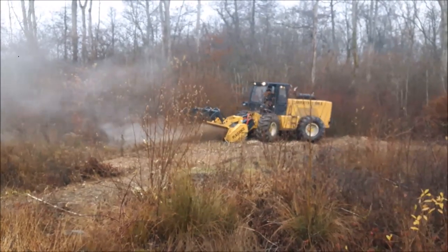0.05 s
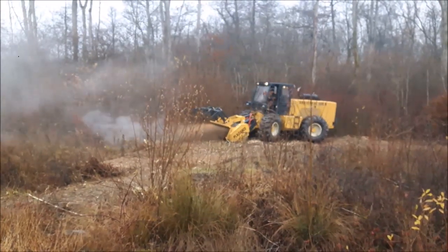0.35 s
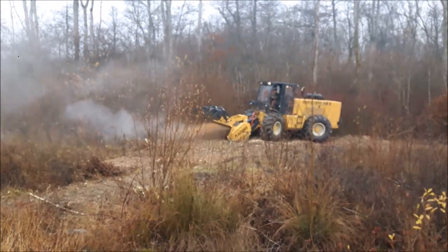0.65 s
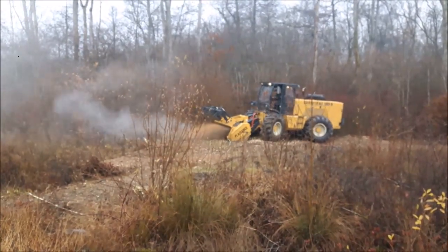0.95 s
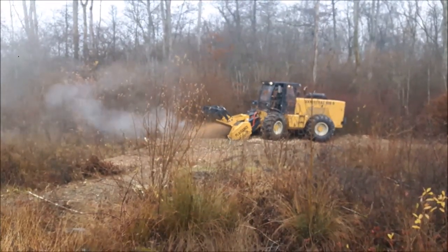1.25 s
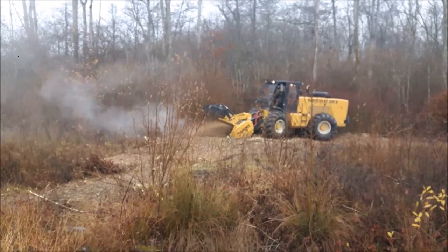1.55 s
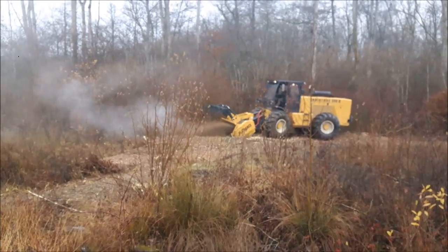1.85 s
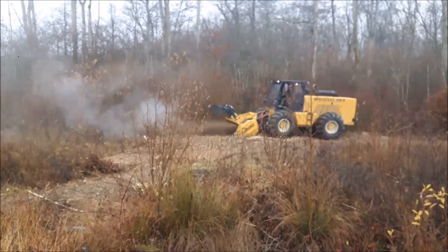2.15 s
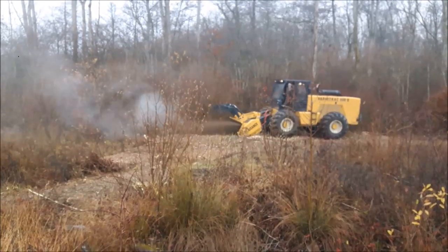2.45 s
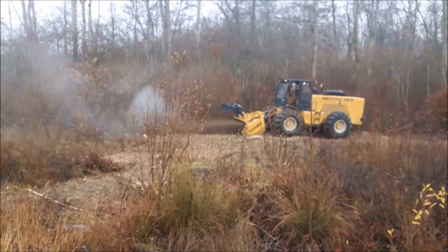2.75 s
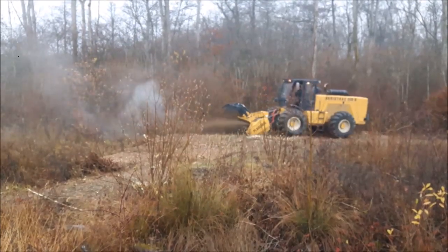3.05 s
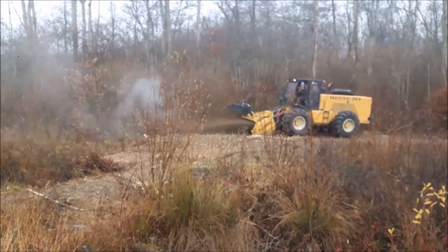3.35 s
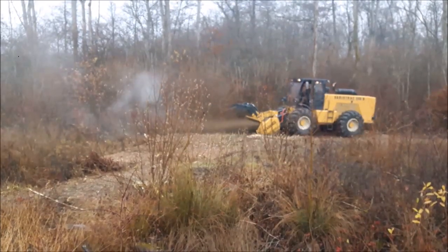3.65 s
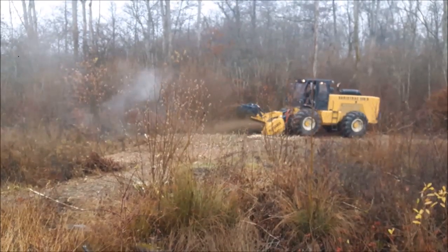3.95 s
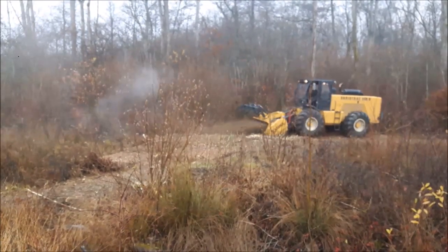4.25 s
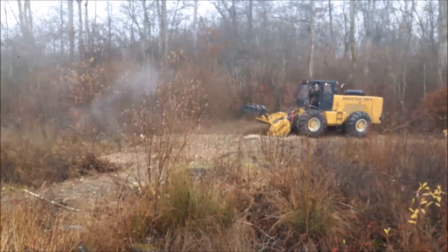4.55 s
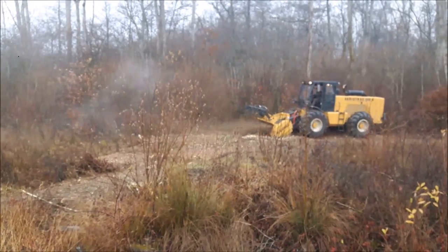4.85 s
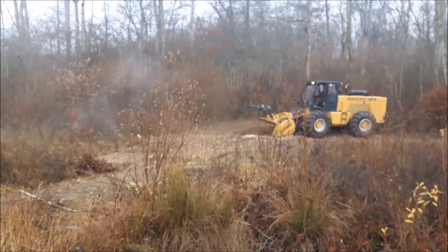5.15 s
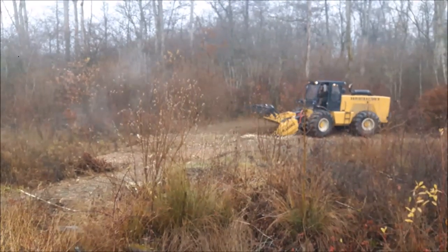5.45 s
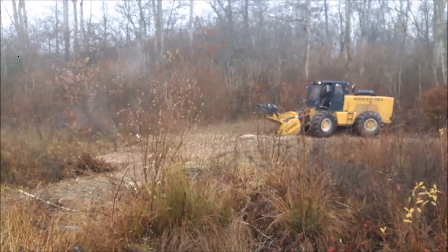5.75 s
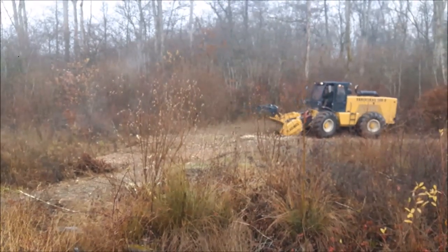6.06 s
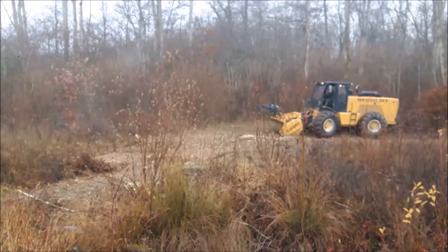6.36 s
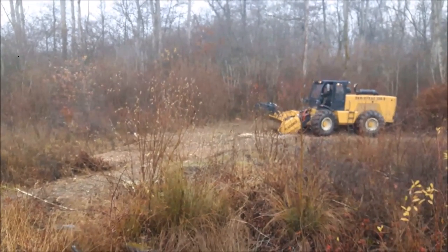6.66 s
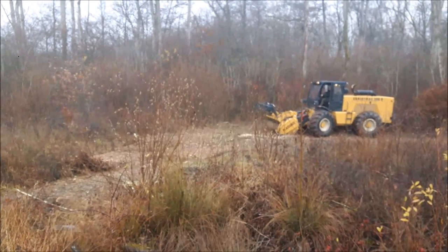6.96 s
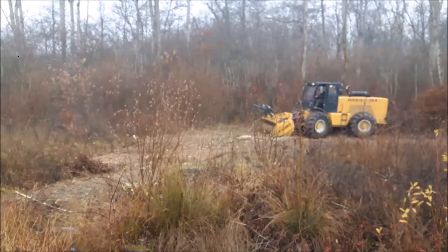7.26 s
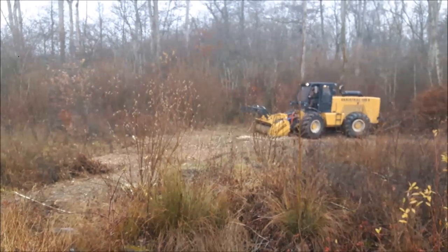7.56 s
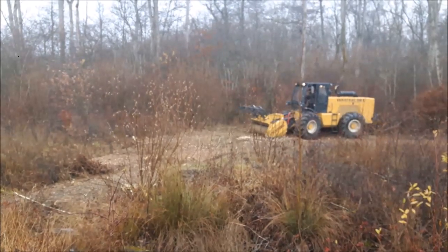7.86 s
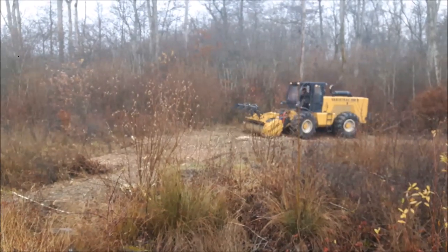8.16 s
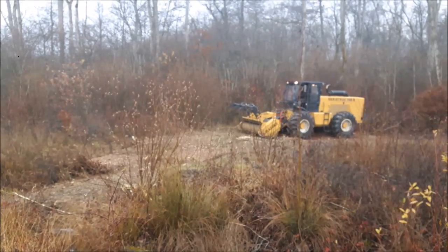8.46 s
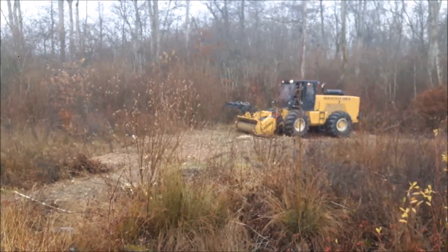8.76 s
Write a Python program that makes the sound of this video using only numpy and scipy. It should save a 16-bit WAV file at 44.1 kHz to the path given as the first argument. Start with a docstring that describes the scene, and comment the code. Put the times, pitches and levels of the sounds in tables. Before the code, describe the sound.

A heavy diesel mulcher sags under a burst of rasping, hissing wood shredding, then climbs back to an even drone. The spinning drum churns and now and then rings as it catches solid wood, while a faint high whistle wavers above. Toward the end the grinding drops away, leaving engine hum, low booming swells and light cracks of sticks. It is heard outdoors from one spot at a moderate distance.

```python
"""A forestry mulcher grinding wood

Some way off, a wheeled mulcher backs across a clearing. Its six-cylinder diesel slows under load in
the first second, recovers, and runs free once the toothed drum lifts, about 6.5 s in. Exhaust pulses
and the churning drum make the drone. The teeth tear wood and ring the steel, the fan roars,
the turbo whistles, and flung chips tick and patter."""
import sys
import numpy as np
from scipy import signal
from scipy.fft import rfft, irfft, next_fast_len
from scipy.io import wavfile
from scipy.ndimage import map_coordinates

SR = 44100
rng = np.random.default_rng(int(sys.argv[2]) if len(sys.argv) > 2 else 0)


def unload_audio(sound):
    """Save the sound as a 16-bit wav file, at the path given as the first command line argument."""
    columns = np.transpose(np.atleast_2d(sound))
    # keep every value between -1 and 1, then stretch to whole-number steps
    steps = np.round(np.clip(columns, -1, 1) * 32767)
    wavfile.write(sys.argv[1], SR, steps.astype(np.int16))


N = 392931
T = np.arange(N) / SR
CYLINDERS, FULL_SPEED_HZ = 6, 110.8  # full speed is counted in firings per second
LIFT_AT_S, LIFT_S = 6.25, 0.52  # when the drum starts to lift out of the wood, and how long it takes


def amp(db):
    """Turns decibels into a gain."""
    return np.exp(np.asarray(db) * (np.log(10) / 20))


def unit(x):
    """Scales a signal to an average (rms) level of 1."""
    return x / np.sqrt(np.mean(x ** 2) + 1e-20)


def curves(rows):
    """Joins a timed table's points into one curve per value column."""
    times, *columns = np.transpose(rows)
    return [np.interp(T, times, column) for column in columns]


def ramp(start_s, length_s):
    """Goes from 0 to 1 and stays there."""
    return np.clip((T - start_s) / length_s, 0, 1)


def swells(rows, rise_s):
    """Adds up the gains of events that rise quickly, then die away."""
    return sum(amp(db) * ramp(start, rise_s) * (1 - ramp(start + rise_s, fade) ** 2) ** 2
               for start, fade, db in rows)


def filtered(x, response):
    """Gives each frequency its own gain, then sets the level to 1."""
    size = next_fast_len(len(x))
    spectrum = rfft(x, size) * response(np.fft.rfftfreq(size, 1 / SR))
    return unit(irfft(spectrum, size)[:len(x)])


def colour(x, spectrum):
    """Shapes a sound's lows and highs to follow a table."""
    hz, db = np.transpose(spectrum)
    return filtered(x, lambda f: amp(np.interp(np.log(f + 1), np.log(hz), db, left=-70, right=-70)))


def ring(x, modes):
    """Makes a sound ring at the listed pitches."""
    return filtered(x, lambda f: sum(amp(db) / (1 + ((f - hz) / (width / 2)) ** 2)
                                     for hz, width, db in modes))


def noise():
    """An even hiss (white noise)."""
    return rng.standard_normal(N)


def wander(rate_hz, step=32):
    """A smooth random wobble, up to about the given rate."""
    knots = T[::step]
    slow = filtered(rng.standard_normal(len(knots)), lambda f: 1 / (1 + (f / step / rate_hz) ** 4))
    return np.interp(T, knots, slow)


def grains(per_s, spread_db):
    """Scattered clicks of random size and sign."""
    at = np.flatnonzero(rng.random(N) < per_s / SR)
    sizes = amp(spread_db * np.minimum(rng.exponential(1, N)[at], 4))
    clicks = np.zeros(N)
    clicks[at] = sizes * rng.choice([-1, 1], N)[at]
    return unit(clicks)


def knocking(firings, share, every, points=400):
    """Noise, a share of which repeats every few firings as the same parts strike again."""
    length = every * points
    pattern = rng.standard_normal(length)
    repeating = np.interp(firings * points, np.arange(length), pattern, period=length)
    return np.sqrt(share) * unit(repeating) + np.sqrt(1 - share) * noise()


# how fast the engine fires: (time [s], firing rate [Hz])
FIRING_RATE = [(0, 101.7), (.22, 101.7), (.55, 86.1), (.82, 75), (1, 73.3), (1.17, 77.7), (1.46, 90.3),
               (1.85, 104), (2.11, 109), (3.28, 109.2), (4.1, 110.5), (5.39, 109.1), (6.1, 111.1),
               (6.8, 111.7), (7.35, 109.2), (8.91, 109.5)]
# how hard the exhaust beats: (time [s], level [dB])
EXHAUST_LEVEL = [(0, -16.5), (.5, -20), (1, -22), (1.8, -17.5), (2.15, -19.8), (3.25, -20.5), (4.1, -23.5),
                 (5.35, -23), (6.9, -27), (8.3, -23), (8.91, -23.5)]


def engine_effort():
    """Firing rate and exhaust level: the engine slows under load, then recovers."""
    firing_hz, = curves(FIRING_RATE)
    exhaust_db, = curves(EXHAUST_LEVEL)
    return firing_hz, exhaust_db


# higher tones in each exhaust pulse: (multiple of the firing rate [x], level [dB])
EXHAUST_OVERTONES = [(2, -3), (3, -5.5), (4, -17)]
# hum of uneven cylinders and driven shafts: (multiple of the engine cycle rate [x], level [dB])
SHAFT_TONES = [(2, -60), (3, -47), (4, -62), (9, -33), (10, -32), (13, -44), (14, -29), (15.36, -32.5),
               (18, -33), (20, -37)]


def diesel(firings, firing_hz, exhaust_db, full_sag_hz=21):
    """Exhaust pulses drone over humming shafts, and sharpen as the slowing engine gets more fuel."""
    strain = np.clip((FULL_SPEED_HZ - firing_hz) / full_sag_hz, 0, 1)
    tone = -np.cos(2 * np.pi * firings) * amp(-0.32 * wander(16))
    edge = -sum(amp(db) * np.cos(2 * np.pi * k * firings) for k, db in EXHAUST_OVERTONES)
    edge_gain = amp(-7 + 6.5 * strain + wander(9))
    pulses = amp(exhaust_db) * (tone + edge_gain * edge)
    cycles = firings / CYLINDERS  # each cylinder fires once per cycle
    shafts = sum(amp(db + 2.5 * wander(1.84)) * np.cos(2 * np.pi * k * cycles + .5 * wander(3.6))
                 for k, db in SHAFT_TONES)
    shaft_gain = amp(-2 - 4 * strain + 0.88 * (exhaust_db - exhaust_db.mean()))
    return np.sqrt(2) * (pulses + shaft_gain * shafts)


# roar of the fan and valves: (frequency [Hz], level [dB])
FAN_SPECTRUM = [(300, -18), (440, -4), (540, -9.5), (640, 2.5), (900, 2), (1060, -1), (1300, -1.5),
                (1450, -3.5), (1680, -17), (2000, -5.5), (2600, -18.5), (3450, -20), (3850, -27.5),
                (6000, -34.5), (15700, -79)]
# low rush of the fan blades: (pitch [Hz], width [Hz], level [dB])
BLADE_RUSH = [(521, 203, 0)]


def fan_and_valves(firings, speed):
    """The cooling fan roars and the valves clatter, both quieter when the engine slows."""
    roar_gain = amp(-28.5 - 1.5 * ramp(LIFT_AT_S, LIFT_S)) * speed ** 0.4
    roar = colour(knocking(firings, share=0.12, every=CYLINDERS), FAN_SPECTRUM)
    rush_gain = amp(-38) * speed ** 5
    return roar_gain * roar + rush_gain * ring(noise(), BLADE_RUSH)


# whines of the gears and oil pumps: (multiple of the engine cycle rate [x], level [dB])
PUMP_WHINES = [(40, -49), (54, -50), (62.25, -47), (70.5, -46), (78, -52), (112, -56)]


def pumps(firings, flutter_db=3.5):
    """Gears and pumps driven by the engine give wavering whines, louder once the drum lifts."""
    cycles = firings / CYLINDERS
    whines = sum(amp(db + flutter_db * wander(5.8)) * np.sin(2 * np.pi * k * cycles + .15 * wander(8.6))
                 for k, db in PUMP_WHINES)
    return np.sqrt(2) * amp(-4 + 3 * ramp(LIFT_AT_S, LIFT_S)) * whines


# boom of the drum's housing: (frequency [Hz], level [dB])
BOOM_SPECTRUM = [(110, -52), (145, -26), (165, 9), (190, 6.5), (215, 2.5), (250, -31.5), (330, -43)]
# moments when the boom swells: (start [s], fade [s], level [dB])
BOOM_SWELLS = [(.18, 0.34, -22), (3.15, 0.96, -25), (6.05, .3, -28), (6.95, 0.54, -27), (7.85, 0.43, -20),
               (8.25, 1.6, -22.5)]
# rumble of tumbling mulch: (frequency [Hz], level [dB])
CHURN_SPECTRUM = [(20, -38), (42, -32), (55, -13.5), (90, -8.5), (135, -10), (200, -4.5), (270, -1),
                  (350, -3), (400, -6.5), (460, -11.5), (530, -30), (800, -81)]


def drum(speed, exhaust_db):
    """The spinning drum booms in its housing and tumbles the mulch, harder as the engine pulls."""
    surges = amp(-1.5) * swells(BOOM_SWELLS, rise_s=0.088)
    boom_gain = np.hypot(amp(-28) * speed ** 4, surges)
    calm = ramp(start_s=5.56, length_s=0.52)  # the drum leaves the deep mulch
    churn_gain = amp(-24 + 0.44 * (exhaust_db - exhaust_db.mean()) - 2.5 * calm) * speed ** 0.2
    return boom_gain * colour(noise(), BOOM_SPECTRUM) + churn_gain * colour(noise(), CHURN_SPECTRUM)


# how much wood the teeth take, compared with steady cutting: (time [s], level [dB])
WOOD_FEED = [(0, 2.5), (.15, 12.5), (.68, 11), (1.1, 5.5), (2.1, -2), (2.6, -2.5), (3.3, 1), (5.3, 1.5),
             (5.9, -3.5), (8.91, -6)]


def in_wood(level_db, follow, lifted_db, linger_s=0):
    """Gain of a cutting noise: it grows with more wood and drops when the drum lifts."""
    feed_db, = curves(WOOD_FEED)
    return amp(level_db + follow * feed_db + lifted_db * ramp(LIFT_AT_S + linger_s, LIFT_S))


# wood tearing: (frequency [Hz], level [dB])
TEAR_SPECTRUM = [(1500, -41), (2180, -14), (2420, 6.5), (2950, 1), (3350, -1), (3800, -10.5), (4250, -16),
                 (4600, -23), (5000, -6), (5900, -50), (6700, -23.5), (9000, -53)]
# hiss of flying fibres: (frequency [Hz], level [dB])
SPRAY_SPECTRUM = [(3000, -29), (4600, -7.5), (6100, -0.5), (6700, -31), (7200, -6.5), (7600, -8.5),
                  (8000, 1), (8700, 0.5), (9600, 2.5), (10800, -2.5), (12000, -11.5), (13000, -12),
                  (14200, -7), (15700, -5)]


def cutting():
    """Teeth tear the wood unevenly and throw a hissing spray of fibres, which hangs on briefly."""
    fibres = noise() + 0.58 * grains(per_s=1500, spread_db=4.5)
    fibres *= amp(1.1 * wander(24))
    tear_gain = in_wood(level_db=-42, follow=1.1, lifted_db=-12)
    spray_gain = in_wood(level_db=-50.5, follow=0.56, lifted_db=-14, linger_s=0.16)
    return tear_gain * colour(fibres, TEAR_SPECTRUM) + spray_gain * colour(fibres, SPRAY_SPECTRUM)


# the teeth catch solid wood: (start [s], fade [s], low ring [dB], high ring [dB], rasp [dB])
SOLID_BITES = [(.39, 0.16, -24, -27, -41), (.62, 0.17, -34, -29, -35), (.78, 0.3, -24, -29, -48),
               (1.284, 0.35, -23, -43, -48), (4.828, 0.23, -19, -31, -41), (5.24, .2, -26, -42, -49),
               (5.51, 0.18, -27, -26, -32), (5.572, .24, -20.5, -34, -51), (6.25, 0.44, -27.5, -37, -55),
               (8.17, .3, -34, -39, -53), (8.5, 0.38, -34, -52, -65)]


def bites():
    """Each bite swells three gains: the steel's low ring, its high ring and the wood's rasp."""
    starts, fades, *levels = np.transpose(SOLID_BITES)
    return [swells(zip(starts, fades, db), rise_s=0.038) for db in levels]


# the steel drum's low ring: (pitch [Hz], width [Hz], level [dB])
LOW_RING = [(1142, 240, -4), (1223, 94, -4), (1276, 76, 5)]
# its high ring: (pitch [Hz], width [Hz], level [dB])
HIGH_RING = [(1798, 294, -2), (1870, 110, 0), (1918, 60, -3.5)]


def steel(firings, low_bites, high_bites, bite_db=-4.5, growth_db_per_s=0.52):
    """Tooth after tooth hits wood and rings the engine-driven drum; solid bites ring it harder."""
    blows = knocking(firings, share=0.21, every=3) + 0.71 * grains(per_s=400, spread_db=3.5)
    blows *= amp(wander(21))
    low_cutting = in_wood(level_db=-33, follow=0.55, lifted_db=-13) * amp(growth_db_per_s * T)
    high_cutting = in_wood(level_db=-34, follow=0.66, lifted_db=-20)
    low_gain = np.hypot(low_cutting, amp(bite_db) * low_bites)
    high_gain = np.hypot(high_cutting, amp(bite_db) * high_bites)
    return low_gain * ring(blows, LOW_RING) + high_gain * ring(blows, HIGH_RING)


# the ring of wood as it is torn: (pitch [Hz], width [Hz], level [dB])
WOOD_RING = [(2760, 720, 11), (3020, 300, -20)]


def wood_rasp(rasp_bites):
    """Solid wood gives a short rasp each time the drum bites into it."""
    scrape = noise() + 0.73 * grains(per_s=750, spread_db=-3)
    return amp(-1) * rasp_bites * ring(scrape, WOOD_RING)


# the turbo's whistle, sinking as its air pressure falls: (time [s], pitch [Hz], level [dB])
TURBO_WHISTLE = [(1.2, 9860, -68), (1.95, 10270, -53), (2.3, 10100, -70), (3.1, 10020, -68),
                 (3.65, 9950, -53), (4.1, 9600, -54), (4.45, 9470, -54), (5, 9420, -62), (5.65, 9680, -59),
                 (5.9, 9500, -61), (6.5, 8680, -53), (6.68, 8450, -63), (6.85, 8220, -50), (7.1, 7970, -53),
                 (7.35, 7870, -61), (7.8, 7990, -55), (8.2, 7990, -59), (8.65, 8180, -61)]


def turbo(jitter=0.00146, flutter_db=4, breath_ratio=1.7, breath_width_hz=440):
    """Spinning blades whistle thinly; a breathy hiss joins in once the load comes off."""
    hz, db = curves(TURBO_WHISTLE)
    phase = 2 * np.pi * np.cumsum(hz * (1 + jitter * wander(106))) / SR
    whistle = np.sqrt(2) * np.sin(phase) * amp(db - 4 + flutter_db * wander(21))
    # two low rumbles are shifted up to make a band of hiss above the whistle
    rumble_a, rumble_b = (ring(noise(), [(0, breath_width_hz, 0)]) for _ in range(2))
    breath = rumble_a * np.cos(breath_ratio * phase) + rumble_b * np.sin(breath_ratio * phase)
    return whistle + amp(-63) * ramp(LIFT_AT_S, LIFT_S) * breath


# loose mulch landing: (frequency [Hz], level [dB])
MULCH_SPECTRUM = [(2200, 7), (3800, -17), (4200, 1), (4550, 6), (5300, -6), (6500, -1), (7500, -1),
                  (10000, -11)]


def mulch_shower(trickle_db_per_s=-3):
    """Loose mulch rains on the ground, building up, then fading to a trickle as the cut ends."""
    build_up = ramp(start_s=2, length_s=3)
    ending = ramp(start_s=LIFT_AT_S - 0.69, length_s=1.4)
    level_db = -49 - 8 * ending + trickle_db_per_s * np.maximum(T - LIFT_AT_S, 0)
    return build_up * amp(level_db) * colour(grains(per_s=7700, spread_db=6), MULCH_SPECTRUM)


# spells of falling chips: (start [s], fade [s], level [dB])
PATTER_SPELLS = [(3.3, 3.4, -59), (6.75, 0.94, -58.5), (7.38, 0.65, -57.5), (8.02, 0.67, -60),
                 (8.78, .3, -54)]
# the tick of a chip or stick: (frequency [Hz], level [dB])
CHIP_SPECTRUM = [(900, -20), (2500, -9), (4000, 10), (6500, -2), (8300, 4), (10300, 1), (12000, -15),
                 (15700, -9)]


def chip_patter():
    """Small chips patter down in clumps."""
    clumps = grains(per_s=260, spread_db=2.5) * amp(4.5 * wander(40))
    return swells(PATTER_SPELLS, rise_s=0.1) * colour(clumps, CHIP_SPECTRUM)


# single chips and snapping sticks: (time [s], level [dB])
STICK_SNAPS = [(3.769, -32), (3.8046, -30), (4.5577, -28), (4.639, -28), (5.2781, -30), (5.8623, -23.5),
               (7.49, -41), (7.5544, -41), (7.6215, -29), (7.664, -32), (7.6914, -39), (7.7977, -38),
               (8.0594, -36), (8.1495, -34), (8.3052, -36), (8.83, -39), (8.8802, -39)]


def stick_snaps(attack_s=0.0007, decay_s=0.0026, tail_db=-18, tail_s=0.029):
    """Each stick breaks with a sharp crack and a brief scatter."""
    out = np.zeros(N)
    t = T[:SR // 8]
    attack = 1 - np.exp(-t / attack_s)
    decay = np.exp(-t / decay_s) + amp(tail_db) * np.exp(-t / tail_s)
    for start, db in STICK_SNAPS:
        crack = colour(rng.standard_normal(len(t)), CHIP_SPECTRUM) * attack * decay
        slot = out[round(start * SR):][:len(t)]
        slot += amp(db - 1) * crack[:len(slot)] / abs(crack).max()
    return out


def ground_bounce(x, lag_s=0.0012, drift_s_per_s=-4e-6):
    """Adds a flipped echo off the ground, whose delay shortens as the machine backs away."""
    delay_s = lag_s + drift_s_per_s * T
    echo = map_coordinates(x, [(T - delay_s) * SR], order=3)
    return x - 0.28 * echo


def scene():
    """The whole machine, heard from one spot."""
    firing_hz, exhaust_db = engine_effort()
    firings = np.cumsum(firing_hz) / SR  # running count, which keeps the engine's parts in step
    speed = firing_hz / FULL_SPEED_HZ
    low_bites, high_bites, rasp_bites = bites()
    engine = diesel(firings, firing_hz, exhaust_db) + fan_and_valves(firings, speed)
    whines = pumps(firings) + turbo()
    grinding = drum(speed, exhaust_db) + steel(firings, low_bites, high_bites) + wood_rasp(rasp_bites)
    debris = cutting() + mulch_shower() + chip_patter() + stick_snaps()
    return (engine + whines + grinding + ground_bounce(debris))[None]


def record(dry):
    """Cuts away the very highest treble."""
    cutoff_hz = 15760
    low_pass = signal.firwin(1023, cutoff_hz, window=("kaiser", 9), fs=SR)
    return signal.oaconvolve(dry, low_pass[None], "same")


dry = scene()
out = record(dry)
unload_audio(out)
```